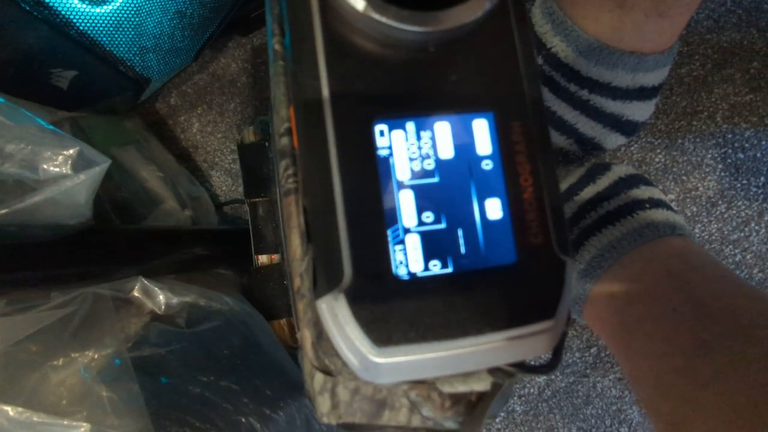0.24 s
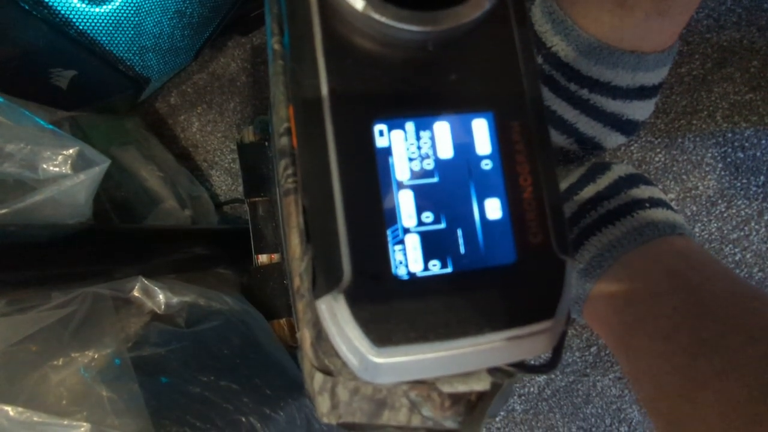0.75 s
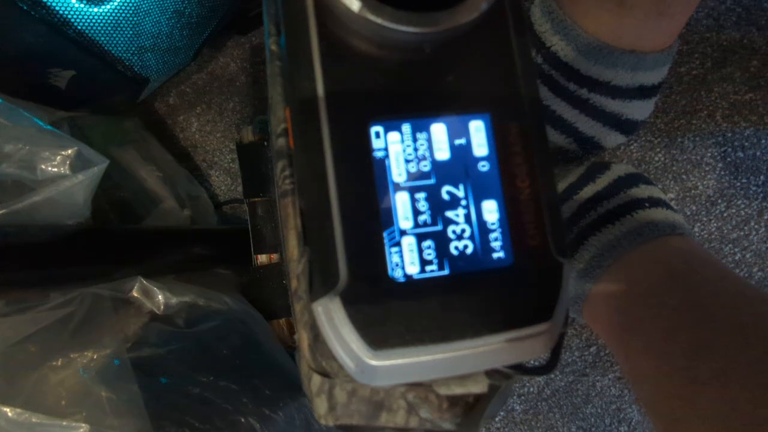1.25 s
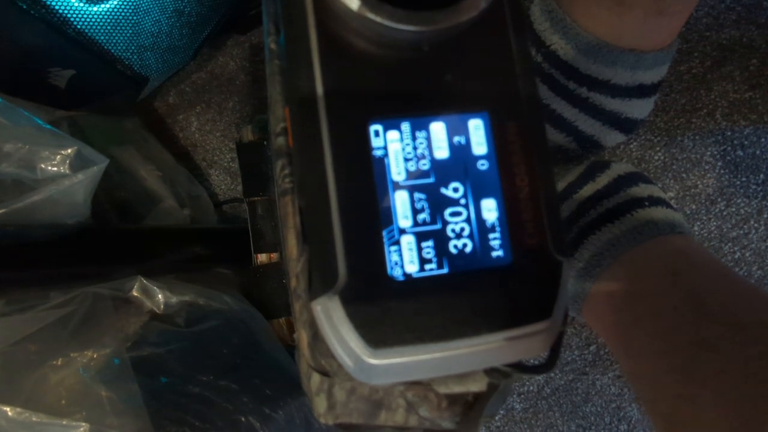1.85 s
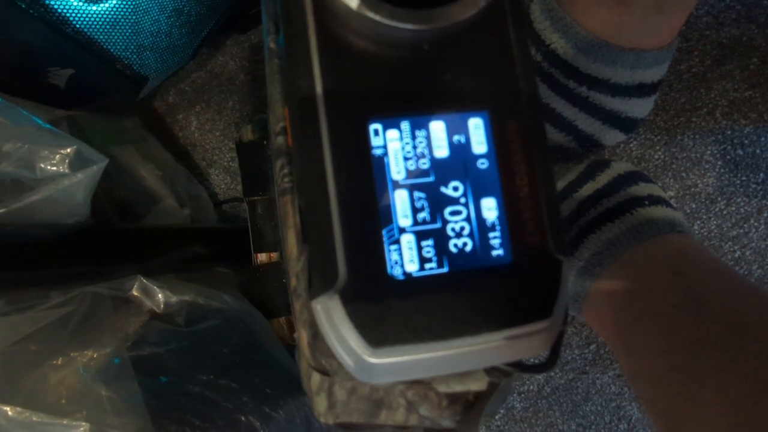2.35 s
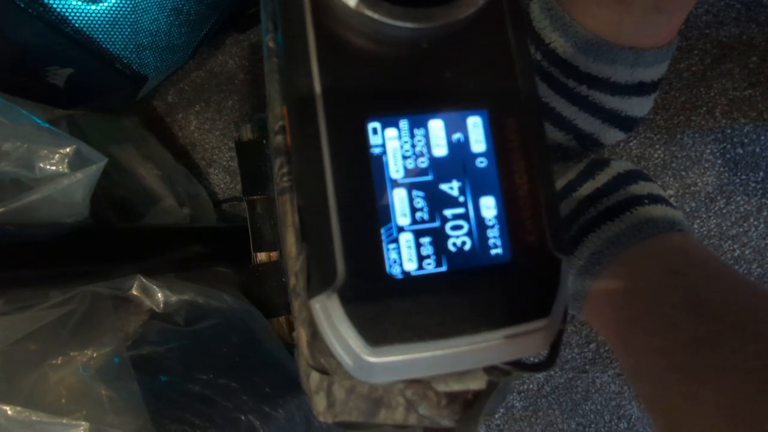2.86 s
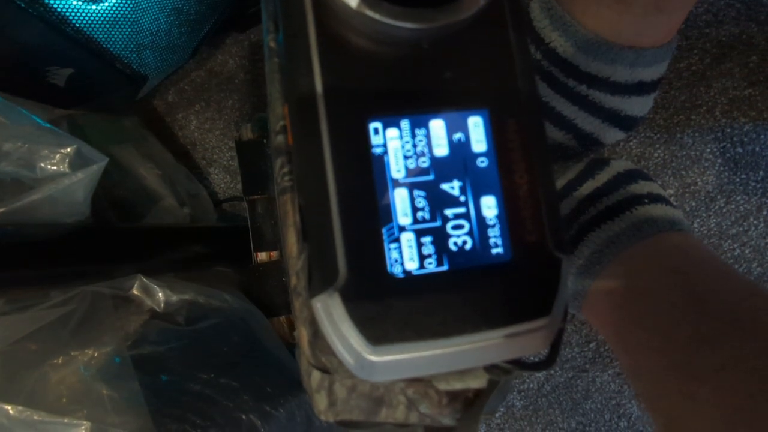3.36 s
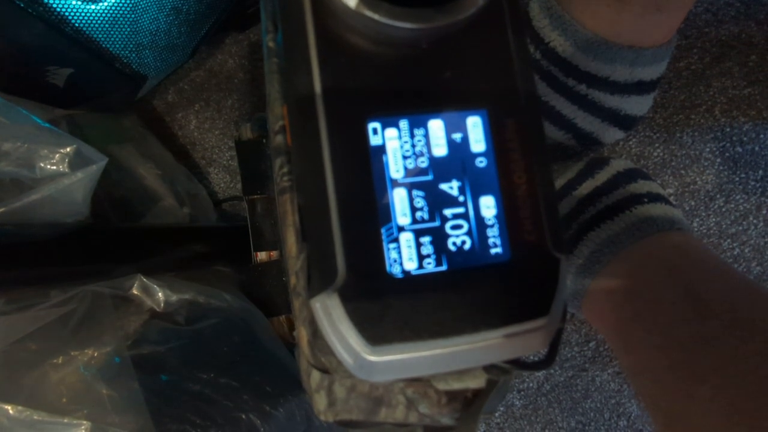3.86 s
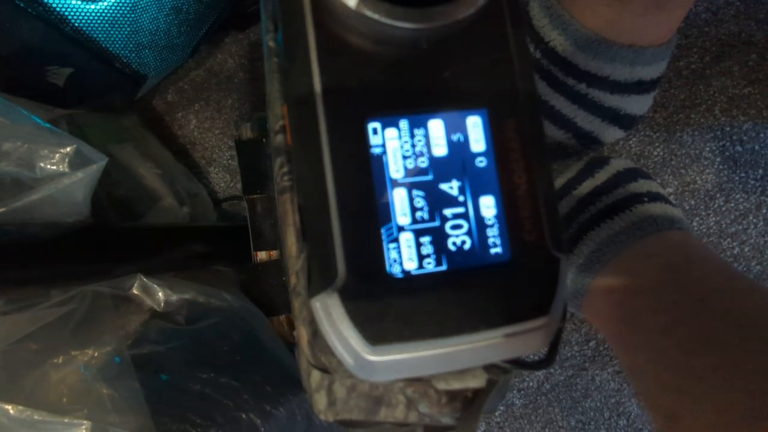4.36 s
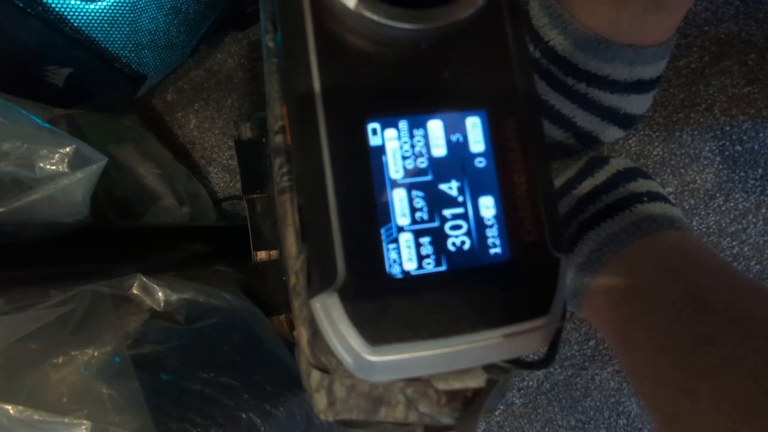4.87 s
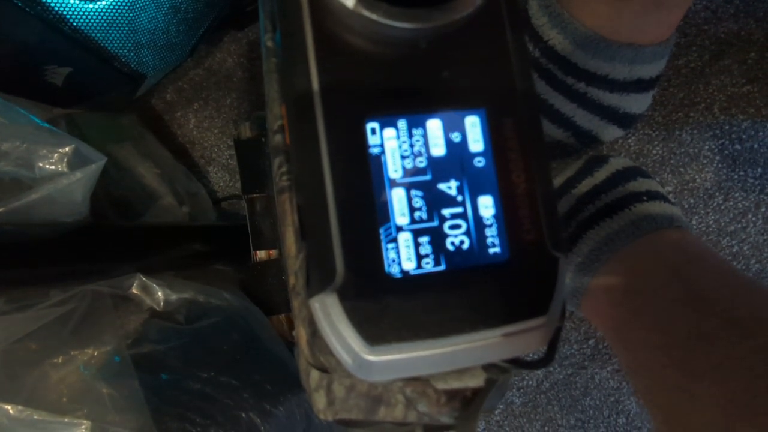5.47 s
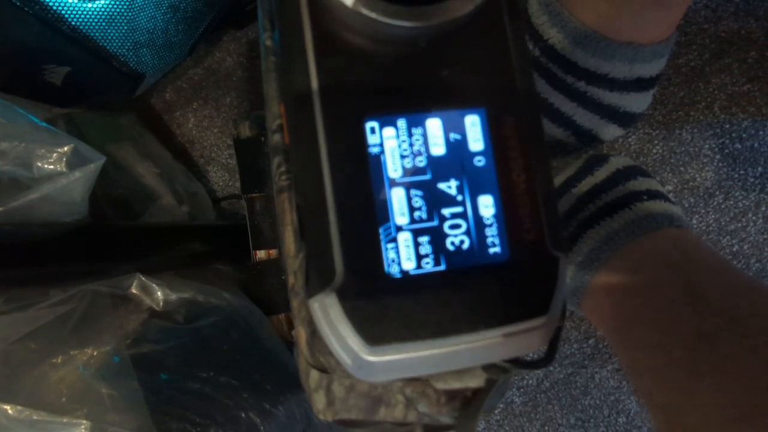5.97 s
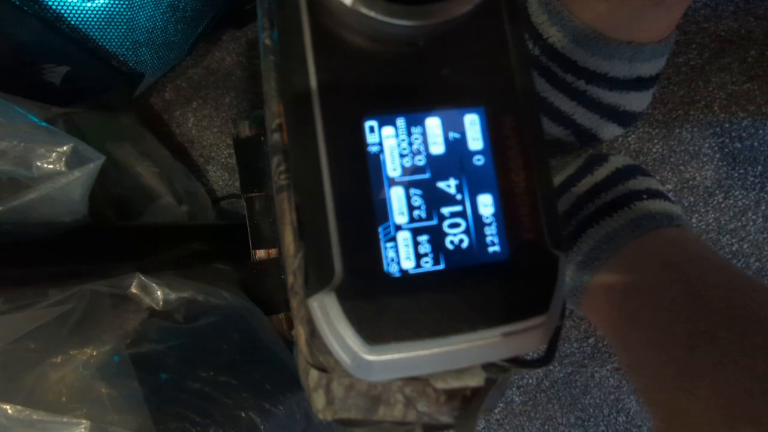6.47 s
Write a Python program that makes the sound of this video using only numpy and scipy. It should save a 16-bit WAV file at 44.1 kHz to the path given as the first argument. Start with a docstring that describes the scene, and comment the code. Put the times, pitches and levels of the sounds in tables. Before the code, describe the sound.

Close stereo pickup in a small furnished room with faint rumble and hiss. An electric airsoft rifle fires eight single shots, a little under a second apart. Each is a tenth-second rising gear whirr, a sharp plastic snap with a short hollow thud, a brief gear run-on and rattling pellets. A hard trigger click follows each shot but the last. Some slams push a soft air thump onto the left microphone. Late, a tiny motor buzzes faintly on the right.

```python
"""Over a low rumble, murmur and hiss, an electric airsoft rifle fires eight single shots in a small furnished room.
In each shot a motor winds a spring through gears (rising tooth tones and grinding noise), then the piston
slams (damped modes, noise bursts and an air jet) and the gears run on. Pellets and loose parts rattle (short
shaped noise bursts); the trigger clicks back after all but the last shot. Late on, a tiny stepping motor near
the right microphone ticks and buzzes (alternating impulses through resonances)."""
import sys
import numpy as np
from scipy import signal
from scipy.fft import rfft, irfft, next_fast_len
from scipy.io import wavfile
from scipy.ndimage import map_coordinates

SR = 44100
rng = np.random.default_rng(int(sys.argv[2]) if len(sys.argv) > 2 else 0)


def waveform_to_disk(signal):
    """Save audio, clipped to [-1, 1], as 16-bit WAV at the path in sys.argv[1]."""
    frames = np.transpose(np.atleast_2d(signal))
    scaled = np.clip(frames, -1, 1) * 32767
    samples = np.round(scaled).astype(np.int16)
    wavfile.write(sys.argv[1], SR, samples)


N = 296352

# shots, levels relative within each sound: trigger_s, piston_s, run_on_db, slam_db, air_puff_db
SHOTS = [(0.7084, 0.8235, -18.5, -13, -18.5), (1.637, 1.7433, -20.5, -18.5, -3),
         (2.5685, 2.6767, -18, -15.5, -28), (3.3518, 3.4591, -18.5, -18, -4),
         (4.1555, 4.2625, -20.5, -16.5, -34), (4.8915, 4.9987, -19, -17, -7),
         (5.671, 5.7787, -19, -17, -6.5), (6.452, 6.5565, -20, -16.5, -27)]
# spectrum of a hard plastic contact: frequency_hz, density_db (relative, per Hz)
SNAP_SPECTRUM = [(120, -52), (200, -16.5), (1940, -13), (2960, -12), (4040, -6), (5420, -5.5), (6050, -2.5),
                 (7410, -0.5), (10100, -10.5), (14300, -8.5), (16000, -19.5)]


def amp(db):
    """Decibels to amplitude: 20 dB is a factor of ten."""
    return 10 ** (np.asarray(db) / 20)


def unit(x):
    """Normalisation to a root-mean-square value of 1."""
    return x / np.sqrt(np.mean(x ** 2) + 1e-20)


def along(points, hz):
    """Linear interpolation of (Hz, value) points on a logarithmic frequency axis."""
    f, v = np.transpose(points)
    return np.interp(np.log(hz + 1), np.log(f + 1), v)


def filtered(x, response):
    """Linear filtering: the spectrum of x times a complex frequency response."""
    n = x.shape[-1]
    m = next_fast_len(n + 4096)
    return irfft(rfft(x, m) * response(np.fft.rfftfreq(m, 1 / SR)), m)[..., :n]


def noise(spectrum, size, channels=1):
    """Coloured noise: independent white noises shaped by a spectrum, to a joint rms of 1."""
    white = rng.standard_normal((channels, size))
    return unit(filtered(white, lambda hz: amp(along(spectrum, hz))))


def wobble(rate, size):
    """Slow random modulation: a smooth curve through rate random knots a second."""
    knots = rng.standard_normal(int(size * rate / SR) + 4)
    return map_coordinates(knots, [np.arange(size) * rate / SR])


def resonances(modes, hz):
    """Modal superposition: second-order resonances (Hz, width Hz, dB) added with alternating sign."""
    total = 0
    for k, (centre, width, db) in enumerate(modes):
        total = total + (-1) ** k * amp(db) * 1j * hz * width / (centre * centre - hz * hz + 1j * hz * width)
    return total


def add(track, s, sound):
    """Superposition: mix a sound into a track from time s."""
    part = track[..., round(s * SR):][..., :sound.shape[-1]]
    part += sound[..., :part.shape[-1]]


def gearbox():
    """Gear meshing: tooth tones follow the motor's speed, grinding noise follows the load, and both ring the shell."""
    # tooth tones: multiple of the tooth rate, level_db (relative)
    mesh_tones = [(.5, -29.5), (1, -9), (1.401, -22), (2, -13), (2.501, -22), (2.999, -12), (3.6, -17.5),
                  (4, -20.5), (5, -21.5)]
    # grinding under load: frequency_hz, density_db (relative, per Hz)
    loaded_spectrum = [(35, -70), (60, -47), (749, -16), (1010, -16), (1380, -7.5), (1620, -16.5),
                       (2840, -12), (3190, -20), (4220, -11.5), (5720, -19.5), (7940, -9), (9790, -22.5),
                       (14900, -19.5), (16000, -22.5)]
    # gears running on unloaded: frequency_hz, density_db (relative, per Hz)
    coast_spectrum = [(35, -55), (60, -15), (946, -3), (1140, -1.5), (1580, -8), (2000, -5), (3500, -9),
                      (4530, -6), (5330, -10.5), (7750, -4.5), (9790, -13), (14600, -10.5), (16000, -19.5)]
    # resonances of the gearbox shell: frequency_hz, width_hz, strength_db (relative)
    shell_modes = [(1330, 50, -1.5), (1970, 230, 7), (4490, 1400, -1), (6320, 77, 12), (7300, 300, -3.5),
                   (14400, 240, 10)]
    mesh_hz, spin_up_s = 1488, .021  # full-speed tooth rate before spring drag; time constant
    spring_drag = .065  # fraction of speed lost to the tightening spring
    wind_db, bite_s, swell_s = -15, .0086, .02  # gears bite before the whine, then swell
    free_s, let_go_s = .006, .0071  # last tooth slips off ahead of the piston; load eases off before that
    run_on_s, brake_db_per_s, ring_db_per_s = .071, 592, 197.5  # a braked part and a slower fade
    face_turn = 1  # radians by which the shell's two faces shake out of step
    lead = .02  # seconds computed ahead of the trigger
    t = np.arange(SR // 2) / SR - lead
    size = len(t)
    faces = np.array([[0], [-1], [1]])  # shared path, left face, right face
    out = np.zeros((2, N))

    def shell_tone_gain(hz):
        highpass = hz ** 4 / (hz ** 4 + 520 ** 4)  # the small shell radiates no bass
        return (.8 + 0.12 * abs(resonances(shell_modes, hz))) * highpass

    def shell_grind_gain(hz):
        return 0.57 + 0.51 * abs(resonances(shell_modes, hz))

    for start, slam_s, run_db, _, _ in SHOTS:
        wind_s = slam_s - start
        swell = (1 - np.exp(-np.maximum(t + bite_s, 0) / swell_s)) ** 2
        load = amp(wind_db) * swell * np.clip((wind_s - free_s - t) / let_go_s, 0, 1)
        freed = t - wind_s
        braked = amp(-brake_db_per_s * np.maximum(freed - run_on_s, 0))
        onset = np.clip((freed + .003) / .006, 0, 1)
        coast = amp(run_db - 5.0) * onset * (braked + amp(-ring_db_per_s * freed))

        speed = (1 - np.exp(-np.maximum(t, 0) / spin_up_s)) * (1 + 0.0027 * wobble(70, size))
        speed = speed * (1 - spring_drag * np.clip(t / wind_s, 0, 1) ** 4)
        phase = 2 * np.pi * mesh_hz * np.cumsum(speed) / SR
        tones = sum(amp(db + 2.5 * wobble(60, size)) * np.sin(k * phase + face_turn * faces)
                    for k, db in mesh_tones)
        tones = filtered(load / np.sqrt(swell + .1) * tones, shell_tone_gain)

        uneven = amp(2.6 * wobble(350, size) + 1.1 * wobble(60, size))  # teeth never meet alike
        grind = load * noise(loaded_spectrum, size, channels=3)
        grind = grind + coast * noise(coast_spectrum, size, channels=3)
        grind = filtered(uneven * grind, shell_grind_gain)
        add(out, start - lead, heard(grind + 1.61 * tones, spread=0.83, wet_db=-8.5))
    return out


def piston():
    """Impact excitation: sliding noise, then a blow that rings the body; the air jet pushes on the left microphone."""
    travel_s = .016
    rebound_hz, rebound_s = 75, .018  # the microphone's mount swings back after the jet
    slide_spectrum = [(60, -18.0), (250, -4.0), (600, -2.0), (1200, -26.5)]
    boom_spectrum = [(40, -12.5), (160, 5), (500, -3.5), (2000, -21)]
    buffet_spectrum = [(15, -10.5), (45, 1.5), (120, -8.5), (900, -33)]
    t = np.arange(SR // 3) / SR
    size = len(t)
    out = np.zeros((2, N))

    def bump(at_s, width_s):
        return np.exp(-((t - at_s) / width_s) ** 2)

    for _, s, _, slam_db, puff_db in SHOTS:
        slide_level = amp(-10 - 60 * t / 0.088) * (1 - np.exp(-t / 0.0045))
        slide = slide_level * noise(slide_spectrum, size, channels=3)
        add(out, s - travel_s, amp(slam_db) * (0.44 * slide[0] + .5 * slide[1:]))

        boom = amp(-6 - 60 * t / 0.07) * noise(boom_spectrum, size, channels=3)
        body = amp(-7.5) * ring(t, [(200, -0.45), (1500, -4)])
        thud = (body + 1.4 * boom[0] + .5 * boom[1:]) * (1 - np.exp(-t / 0.0013))
        crack = amp(6.5 - 60 * t / 0.005) * noise(SNAP_SPECTRUM, size, channels=2)
        add(out, s, amp(slam_db) * (thud + crack))

        push = .4 * bump(.0006, .0004) - bump(.0013, .00045)  # a short squeeze, then a deep suction
        rebound = 0.049 * np.sin(2 * np.pi * rebound_hz * t) * np.exp(-t / rebound_s)
        buffet = amp(-13.0 - 60 * t / 0.14) * noise(buffet_spectrum, size)[0]
        add(out[0], s, amp(puff_db) * (push + rebound + buffet))
    return out


def ring(t, strength_db):
    """Modal decay: damped sines struck at new strengths; loose joints blur the higher modes' phase most."""
    # modes of rifle and box: frequency_hz, level_db (relative), t60_s
    body_modes = [(199.4, -4, .35), (327.4, -3.5, 0.13), (459, -0.5, 0.11), (780, -7.5, .05),
                  (95, -6, 0.07), (1285, -21, .2), (1935, -22, 0.08)]
    blur_s = .0015  # phase wobble in radians per Hz
    total = np.zeros(len(t))
    for hz, db, t60 in body_modes:
        level = amp(db + rng.normal(0, 0.85) + along(strength_db, hz) - 60 * t / t60)
        phase = rng.uniform(0, 2.1) + blur_s * hz * wobble(50, len(t))
        total += level * np.sin(2 * np.pi * hz * t + phase)
    return total


def rattle():
    """Repeated impact: bright contacts are pellets, nearer the middle, the very brightest a little left;
    dull ones sit in the rifle, to the right."""
    # pellet and pawl contacts: time_s, peak_db (relative), brightness_db
    contacts = [(0.872, -7, 9), (0.888, -4.5, 9.5), (0.896, -5.5, 17), (0.932, -9.5, -12), (0.939, -9, 3),
                (0.945, -8.5, 3.5), (0.955, -6, -1.5), (0.989, -19.5, -7), (1.015, -17.5, -1),
                (1.019, -14, -4), (1.025, -10.5, 2.5), (1.051, -23.5, -8), (1.098, -18.5, -2),
                (1.108, -18, -3), (1.161, -37.5, 0), (1.175, -39.5, -7), (1.253, -43.5, -17),
                (1.332, -46, -9.5), (1.345, -46.5, -30), (1.381, -32, -2.5), (1.405, -44.5, -15.5),
                (1.424, -38.5, -16), (1.52, -45.5, -6.5), (1.792, -9, 8), (1.828, -15, 6), (1.861, -9.5, 2),
                (1.876, -12.5, -2.5), (1.895, -28, 8), (1.925, -23.5, -3), (1.938, -24, -4),
                (1.95, -31, -3), (1.965, -23.5, 3), (2.019, -28, -8), (2.573, -15.5, -2.5),
                (2.759, -22.5, 3), (2.779, -5.5, 9.5), (2.782, -10, 4.5), (2.808, -27, 15),
                (2.834, -34.5, -4), (2.858, -17, 4), (2.887, -31, -3), (2.919, -23, -7), (3.027, -30.5, 2),
                (3.063, -25, 5.5), (3.158, -36.5, -7.5), (3.23, -19, 3.5), (3.252, -28, -1.5),
                (3.279, -42.5, -15.5), (3.347, -16, 7), (3.479, -13, 24.5), (3.488, -13, 18),
                (3.532, -7.5, 17.5), (3.55, -3.5, 8.5), (3.614, -21, -12.5), (3.669, -28.5, -5),
                (3.68, -19, 6), (3.928, -43, -10), (3.972, -22, -1), (4.025, -32.5, 1.5), (4.312, -5, -0.5),
                (4.346, -19, 15), (4.392, -34, -9), (5.027, -9, 7.5), (5.092, -22, -9), (5.114, -15, -4.5),
                (5.15, -18.5, -5), (5.165, -29, -1), (5.262, -29.5, -5), (5.857, -7.5, 35),
                (5.9, -30.5, -5), (5.917, -24.5, -5), (6.611, -3, 0.5), (6.636, -21, 20), (6.659, -12, 4.5),
                (6.668, -9, 30), (6.685, -9.5, 3), (6.715, -10, 8)]
    chatter_per_shot, chatter_s = 14, .09  # loose parts while the gears run on
    # level relative to the run-on, its scatter, its fade over chatter_s, and the mean brightness
    chatter_db, scatter_db, fade_db, chatter_bright_db = 4.5, 5.5, 11.5, 6
    rise_s = .0004
    chatter = []
    for _, slam_s, run_db, _, _ in SHOTS:
        for late in rng.uniform(size=chatter_per_shot):
            db = run_db + chatter_db - fade_db * late + scatter_db * rng.normal()
            chatter.append((slam_s + .008 + chatter_s * late, db, chatter_bright_db + 5 * rng.normal()))
    out = np.zeros((2, N))
    for s, db, bright_db in contacts + chatter:
        pan_db = -2 + 0.14 * bright_db + rng.normal(0, 2.0)  # positive is left
        add(out, s - rise_s, click(db + 1.5, bright_db, pan_db, t60=0.014, wet_db=-10.0))
    return out


def trigger_return():
    """Spring release: the trigger snaps back with a hard click and rings the body, the ring stronger on the right."""
    # moments of the snap: time_s
    return_times = [1.066, 1.986, 2.93, 3.7, 4.511, 5.21, 5.982]
    snap_db, rise_s = -10, .0004
    t = np.arange(SR // 3) / SR
    out = np.zeros((2, N))
    for s in return_times:
        add(out, s - rise_s, click(snap_db, 5.86, -4.0, t60=0.022, wet_db=-7.5))
        body = amp(snap_db - 19.5) * ring(t, [(500, -33.5), (1200, 8.4)])
        add(out, s, body * amp([[-3], [3]]))
    return out


def click(db, bright_db, pan_db, t60, wet_db):
    """Hard contact: a brief broadband crack, its treble tilt set by brightness, and the room's answer."""
    t = np.arange(SR // 50) / SR

    def tilt(hz):
        return amp(along([(2500, -0.67), (7000, 0.67)], hz) * (bright_db - 7))

    crack = unit(filtered(noise(SNAP_SPECTRUM, len(t), channels=3), tilt))
    envelope = amp(-60 * t / t60) * (1 - np.exp(-(t / 0.00079) ** 2))
    pair = (0.39 * crack[0] + 0.72 * crack[1:]) * envelope
    pair = pair * amp(db + np.array([[pan_db / 2], [-pan_db / 2]]))
    # the walls hear all faces of the contact: an even colour
    impulse = 1. * (np.arange(len(t)) == 100)
    blow = filtered(impulse, lambda hz: tilt(hz) * amp(along(SNAP_SPECTRUM, hz)))
    blow = blow / np.linalg.norm(blow) * np.linalg.norm(pair, axis=1, keepdims=True)
    answer = room((blow + blow.mean(axis=0)) / 2)
    return np.pad(pair, ((0, 0), (0, SR // 3))) + amp(wet_db) * answer


def stepper():
    """Periodic impulses: every 6 ms a coil pulls and 1 ms later lets go, two opposite ticks and a faint shiver."""
    # lone steps and buzzing bursts: start_s, end_s, level_db (relative)
    bursts = [(6.199, 6.2, -55), (6.212, 6.2144, -49), (6.223, 6.227, -43), (6.243, 6.366, -45.5),
              (6.385, 6.462, -45.5)]
    # resonances of the stepping motor: frequency_hz, width_hz, strength_db (relative)
    motor_modes = [(3480, 1100, -11), (4250, 770, 5), (5320, 530, 2.5), (7900, 1040, 4), (10300, 870, -10),
                   (11400, 900, -7)]
    tick_db = [4, 1.0, -26, -7, -15, -24]  # pull, let go, then the shiver, 1 ms apart
    ticks = np.zeros(N)
    for begin, end, db in bursts:
        beats = np.arange(begin, end, .006)
        for after_ms in range(6):
            lone_db = -20 * (after_ms > 3) * (end - begin < .01)  # a lone step shivers less at its end
            level_db = db + 22.5 + tick_db[after_ms] + lone_db + rng.normal(0, 2, len(beats))
            places = np.round((beats + after_ms / 1000) * SR).astype(int)
            ticks[places] += (-1) ** after_ms * amp(level_db)
    motor = filtered(ticks, lambda hz: resonances(motor_modes, hz) / (1 + (hz / 13500) ** 8))
    return motor * amp([[-21], [0]])  # near the right microphone


def heard(source, spread, wet_db):
    """Stereo propagation: a shared path and two separate faces reach the microphones, then the room's answer."""
    # left-right difference: frequency_hz, level_db
    side_balance = [(60, -2), (110, -6.5), (200, -2.5), (380, 0.5), (700, -4.5), (1290, -5.5), (2380, 1.5),
                    (4400, -10), (8120, -2.5), (15000, 1.5)]
    lag_s = .0001  # the left microphone hears the rifle later
    shared, left, right = source

    def half(hz):
        return amp(along(side_balance, hz) / 2) * np.exp(-1j * np.pi * hz * lag_s)

    pair = np.cos(spread) * shared + np.sin(spread) * np.array([left, right])
    pair = filtered(pair, lambda hz: np.array([half(hz), 1 / half(hz)]))
    return np.pad(pair, ((0, 0), (0, SR // 3))) + amp(wet_db) * room(pair)


def room(pair):
    """Reverberation: convolution with noise in which each frequency dies away at its own rate."""
    # reverberation time: frequency_hz, t60_s
    decay_times = [(200, 0.2), (800, 0.3), (2100, 0.22), (5500, 0.18), (14600, 0.16)]
    hz, t, z = signal.stft(rng.standard_normal((2, SR // 3)), SR, nperseg=128)
    decay = amp(-60 * t / along(decay_times, hz)[:, None])
    tail = signal.istft(z * decay, SR, nperseg=128)[1][:, :SR // 3 - 131]
    delayed = np.pad(pair, ((0, 0), (132, 0)))  # the answer starts 3 ms late
    return signal.fftconvolve(delayed, tail / np.linalg.norm(tail[0]), axes=1)


def background():
    """Partial coherence: rumble and murmur partly shared by both microphones, separate hisses, a faint whistle."""
    # slow level curves, relative: time_s, rumble_db, murmur_db, hiss_db
    air_levels = [(0, -62, -62.5, -65), (0.701, -60.5, -62.5, -64.5), (1.3, -74, -61.5, -67.5),
                  (1.6, -74, -65.5, -70.5), (2.299, -68.5, -62.5, -66), (3.8, -71, -64.5, -69),
                  (4.7, -72, -65.5, -67.5), (5.5, -77, -63.5, -67), (6.72, -74, -68.5, -64)]
    # spectra of the three layers: frequency_hz, density_db (relative, per Hz)
    rumble_spectrum = [(20, -30.5), (45, -8.5), (70, 3.5), (150, 0.5), (300, -41)]
    murmur_spectrum = [(100, -13), (220, -2), (380, 0), (500, -7.5), (800, -16), (1500, -42.5)]
    hiss_spectrum = [(410, -23), (700, -1.5), (1180, -9.5), (1280, -5.5), (1620, -6), (2800, -10),
                     (7290, -11.5), (9110, -18), (14400, -14.5), (16000, -23.5)]
    t = np.arange(N) / SR
    s, *levels = np.transpose(air_levels)
    rumble_db, murmur_db, hiss_db = [np.interp(t, s, db) for db in levels]
    rumble = noise(rumble_spectrum, N, channels=3)
    murmur = noise(murmur_spectrum, N, channels=3)
    low = amp(rumble_db + 1.3 * wobble(28.0, N)) * (0.91 * rumble[0] + 0.62 * rumble[1:])
    mid = amp(murmur_db + 1.5 * wobble(3.4, N)) * (.8 * murmur[0] + 0.36 * murmur[1:])
    hiss = amp(hiss_db) * noise(hiss_spectrum, N, channels=2)
    whistle = amp(-92.5) * np.sin(2 * np.pi * 10545 * t)
    return low + mid + hiss + whistle


def scene():
    """Superposition of all the sources at the two microphones."""
    return gearbox() + piston() + rattle() + trigger_return() + stepper() + background()


def record(dry):
    """Saturation and band limits: peaks flatten near full scale, deep bass weakens, the top is cut by 60 dB."""
    top_hz = 15900
    flattened = dry / (1 + np.abs(dry) ** 6) ** (1 / 6)
    bass_cut = filtered(flattened, lambda hz: (1j * hz / (40 + 1j * hz)) ** 2)
    return filtered(bass_cut, lambda hz: np.clip((top_hz - hz) / 300 + .5, .001, 1))


dry = scene()
out = record(dry)
waveform_to_disk(out)
```